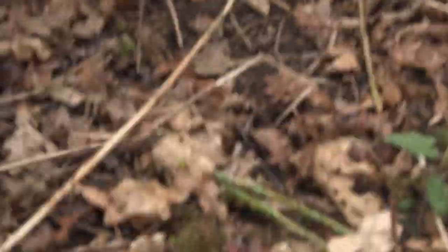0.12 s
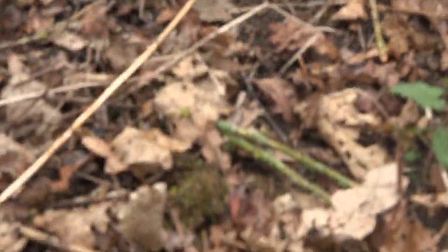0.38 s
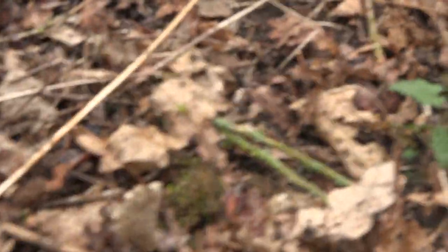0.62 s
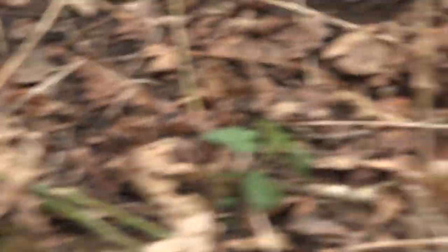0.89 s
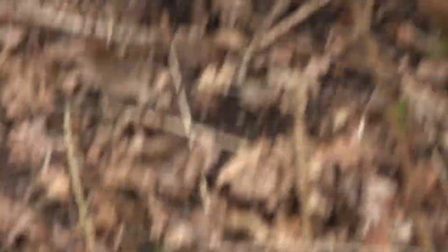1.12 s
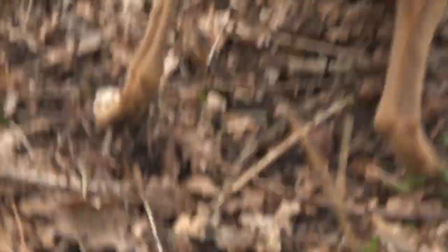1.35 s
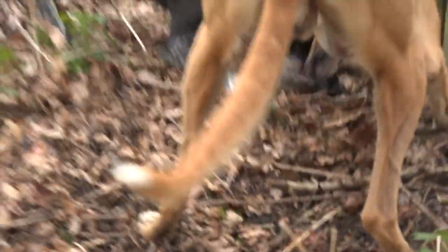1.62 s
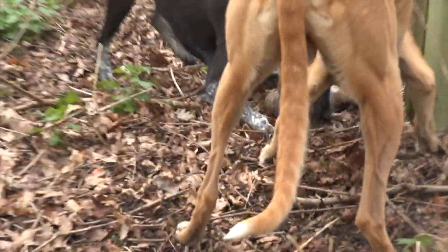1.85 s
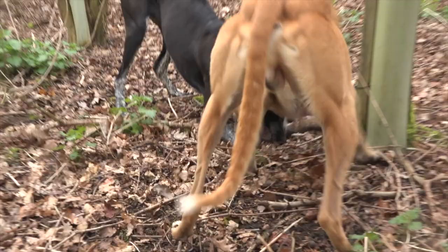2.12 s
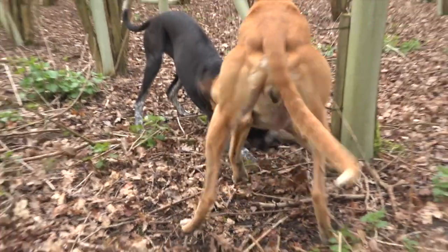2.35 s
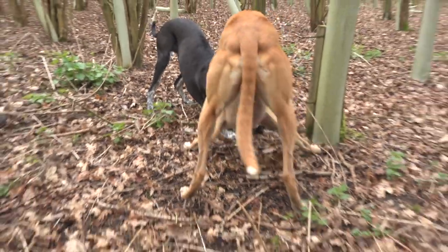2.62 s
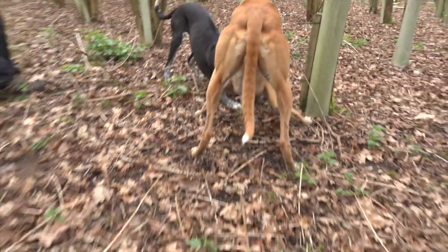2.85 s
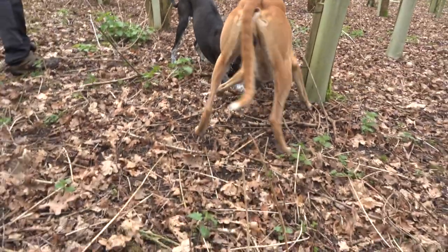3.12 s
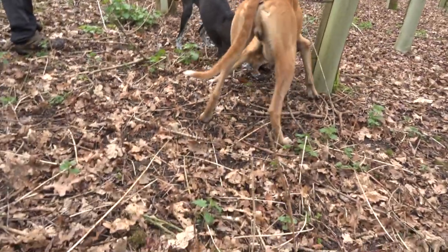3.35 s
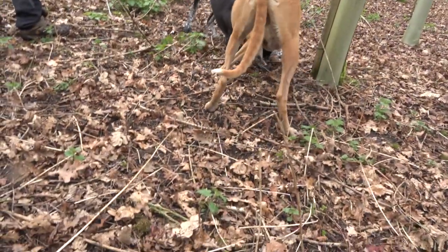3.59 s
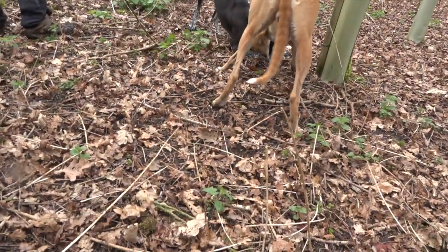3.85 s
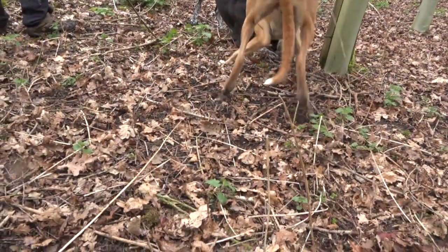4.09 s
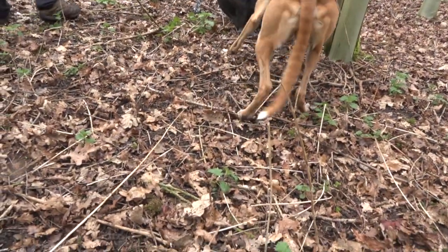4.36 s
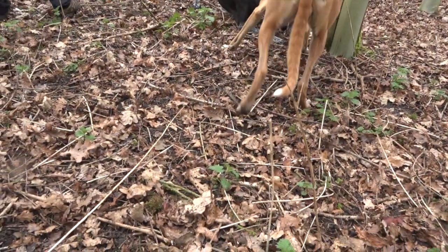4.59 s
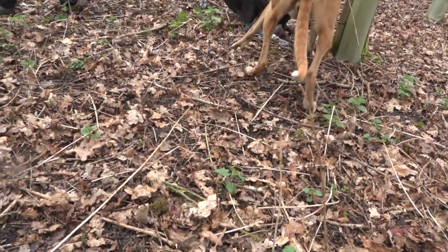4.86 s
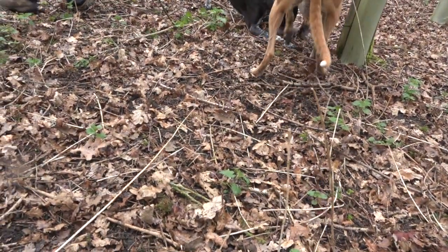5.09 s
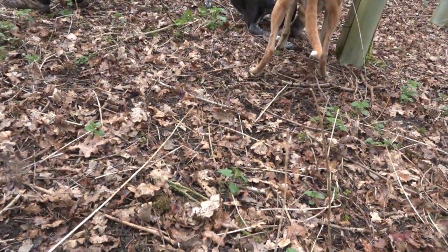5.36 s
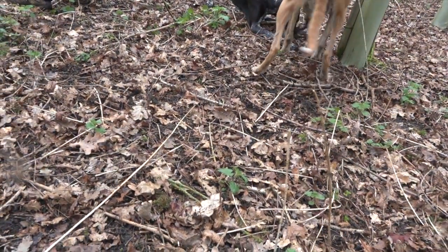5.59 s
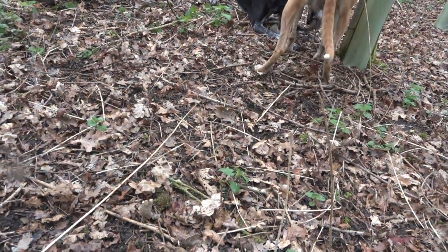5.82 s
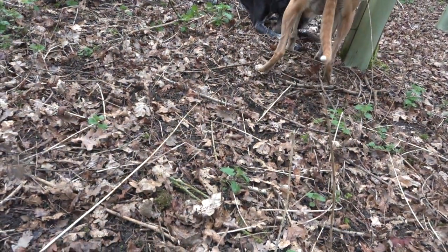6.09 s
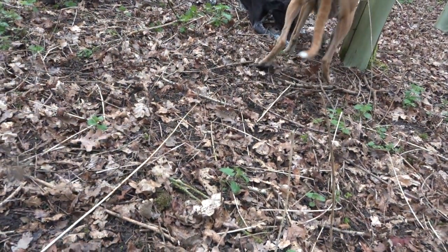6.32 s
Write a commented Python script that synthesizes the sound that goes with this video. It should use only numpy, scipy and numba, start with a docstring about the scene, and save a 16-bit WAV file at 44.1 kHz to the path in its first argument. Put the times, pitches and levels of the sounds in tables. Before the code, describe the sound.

Two dogs root through dry woodland leaves, rustling and snapping twigs, then snort and squeak through their noses while birds call faintly far off.

```python
"""Two dogs nose through dry leaf litter in a young wood, over a quiet hush and short echoes from the trunks.
First leaves rustle and twigs snap over thudding paws; then snorts hiss through nose resonances,
breaking into squeaks and reedy whistles. From 1.4 s hoarse bands of noise call as distant birds.
After 3.2 s the snorts pause; one dog whines at 4.1 s, a short glide of harmonics.
More snorts and squeaks follow from 4.6 s, and the last leaves snap and rustle at the end."""
import sys
import numpy as np
from scipy import signal
from scipy.fft import rfft, irfft, next_fast_len
from scipy.io import wavfile
from scipy.ndimage import uniform_filter1d
from numba import njit

SR = 44100
rng = np.random.default_rng(int(sys.argv[2]) if len(sys.argv) > 2 else 0)


def output_pcm(signal):
    """Save a mono or channel-first signal as 16-bit PCM at the path in sys.argv[1].

    Samples are clipped to [-1, 1] before scaling.
    """
    pcm = np.clip(np.atleast_2d(signal).T, -1, 1) * 32767
    wavfile.write(sys.argv[1], SR, np.round(pcm).astype(np.int16))


def boost_factor(decibels):
    """Convert a level in decibels to a linear amplitude factor."""
    exponent = np.asarray(decibels, float) / 20
    return 10 ** exponent


N = 284886  # samples, about 6.5 s
T = np.arange(N) / SR


def unit(x):
    """Normalisation: scale to rms 1."""
    return x / np.sqrt(np.mean(x ** 2))


def colour(x, points):
    """Linear filtering: shape the spectrum by (freq_hz, gain_db) points, straight in log frequency."""
    hz, db = np.transpose(points)
    size = next_fast_len(N)
    f = np.maximum(np.arange(size // 2 + 1) * SR / size, 1)
    gain = boost_factor(np.interp(np.log(f), np.log(hz), db))
    return irfft(rfft(x, size) * gain, size)[..., :N]


@njit
def svf(x, hz, width):
    """Resonance: a state-variable band-pass whose centre and width (Hz) move every sample."""
    y, b, l = np.empty(len(x)), 0., 0.
    for i in range(len(x)):
        g, k = np.tan(np.pi * hz[i] / SR), width[i] / hz[i]
        v = (b + g * (x[i] - l)) / (1 + g * (g + k))
        b, l, y[i] = 2 * v - b, l + 2 * g * v, k * v
    return y


@njit
def grains(start, hz, cycles, size, pan):
    """Impulse response of a damped oscillator: sine blips, each panned by its own amount."""
    out = np.zeros((2, N))
    for k in range(len(start)):
        # amplitude falls by a factor e in the given number of cycles
        p = np.exp(2j * np.pi * hz[k] / SR - hz[k] / (cycles[k] * SR))
        z = size[k] + 0j
        for i in range(start[k], min(N, start[k] + int(6 * cycles[k] * SR / hz[k]))):
            z *= p
            out[0, i] += z.imag * (1 + pan[k])
            out[1, i] += z.imag * (1 - pan[k])
    return out


def walk(rate):
    """Slow random modulation: normal levels held 1 / rate s and slewed twice; spread near 0.8."""
    k = max(int(SR / rate), 1)
    held = np.repeat(rng.standard_normal(N // k + 1), k)
    return 1.122 * uniform_filter1d(uniform_filter1d(held, k), k)[:N]


def wide(side_hz):
    """Interaural coherence: two-channel noise, alike in the bass and less so in the treble."""
    mid, side = rng.standard_normal((2, N))
    side = colour(side, [(500, -28), (0.6 * side_hz, -18), (side_hz, -5), (16000, -8)])
    return mid + side * np.array([[1], [-1]])


def swell(start, hold, attack, release):
    """Amplitude envelope: straight rise, hold, exponential release, all in s."""
    rise = np.clip((T - start) / attack, 0, 1)
    return rise * np.exp(-np.maximum(T - start - hold, 0) / release)


def between(ends, share):
    """Linear interpolation: a value from its ends at share 0 and 1."""
    return ends[0] + (ends[1] - ends[0]) * np.clip(share, 0, 1)


def calls(tables, fade_s):
    """Gating: columns of all calls joined in time, and a gate that opens for each."""
    rows = np.concatenate(tables)
    gate = sum(np.clip(np.minimum(T - t[0][0], t[-1][0] - T) / fade_s, 0, 1) for t in tables)
    return gate, [np.interp(T, rows[:, 0], column) for column in rows.T[1:]]


def tones(tables, wobble, flutter_db, fade_s):
    """Harmonic series: partials of one wavering pitch, each fluttering alone."""
    gate, (hz, *levels_db) = calls(tables, fade_s)
    phase = 2 * np.pi * np.cumsum(hz * (1 + wobble * walk(300))) / SR
    partials = [boost_factor(db + flutter_db * walk(120)) * np.sin((k + 1) * phase)
                for k, db in enumerate(levels_db)]
    return gate * np.sqrt(2) * sum(partials)


def notes(rows, partials_db):
    """Glide and envelope: each note slides evenly, peaks early and fades, with shared partials."""
    shape = [(0, -8), (0.35, 0), (1, -6)]  # share of length, dB
    return [[(start + u * length, between((first, last), u), *(db + d + np.array(partials_db)))
             for u, d in shape]
            for start, length, db, first, last in rows]


# spectrum of the woodland hush: freq_hz, gain_db
HUSH_SPECTRUM = [(15, -34), (30, 5), (48, 3.5), (153, 0.5), (180, -6), (326, -8.5), (575, -17),
                 (1260, -11.5), (1610, -12.5), (2690, -16), (4000, -27.5), (9000, -30), (16000, -71)]


def hush():
    """Diffuse ambience: partly coherent noise with a fixed spectrum and a slowly wandering level."""
    return unit(colour(wide(5100), HUSH_SPECTRUM)) * boost_factor(-61.5 + walk(3.134))


def trunks(x):
    """Reverberation: scattered, fading echoes from the trunks, partly different at each ear."""
    t60_s, onset_s, level_db = 0.23, 0.012, -19  # level before the colouring
    t = T[:SR // 2]
    mid, side = rng.standard_normal((2, len(t))) * boost_factor(-60 * t / t60_s) * np.clip(t / onset_s, 0, 1)
    echo = mid + 0.23 * side * np.array([[1], [-1]])
    wet = signal.fftconvolve(x, echo / np.sqrt(np.sum(mid ** 2)), axes=1)[:, :N]
    return boost_factor(level_db) * colour(wet, [(1000, 4), (5000, 7.5), (12000, -19)])


# hoarse far calls: start_s, length_s, level_db, pitch_hz
BIRD_CALLS = [(1.405, 0.37, -54, 2080), (1.93, .2, -65, 1260), (2.743, 0.53, -58.5, 1320),
              (3.237, 0.41, -56.5, 2040), (3.768, 0.26, -65.5, 1300), (4.5, 0.27, -67.5, 1270),
              (5.32, 0.39, -58.5, 1980)]


def birds():
    """Filtered noise: breathy bands that scoop up towards pitch and sag, with a weak octave."""
    scoop, scoop_s, sag, width_hz = 0.16, 0.045, 0.12, 200  # scoop and sag as shares of the pitch
    hz, gain = np.full(N, 1000.), 0
    for start, length, db, pitch in BIRD_CALLS:
        since = np.maximum(T - start, 0)
        bend = 1 - scoop * np.exp(-since / scoop_s) - sag * np.minimum(since / length, 1) ** 2
        hz = np.where(T >= start, pitch * bend, hz)
        gain = gain + boost_factor(db) * swell(start, 0.47 * length, 0.032, 0.15)

    def band(k):
        """Cascaded resonance: noise filtered twice around k times the pitch."""
        once = svf(rng.standard_normal(N), k * hz, np.full(N, k * width_hz))
        return unit(svf(once, k * hz, np.full(N, 2 * k * width_hz)))

    return gain * (band(0.95) + boost_factor(-13.5) * band(1.97))


# paws landing: start_s, level_db (before a common gain), pitch_hz
PAW_THUDS = [(0.105, -49.5, 87), (0.605, -44, 127), (0.679, -40, 196), (0.719, -49, 159), (1.008, -51, 146),
             (2.1, -49, 100), (2.406, -48, 153.6), (2.423, -49, 198), (2.446, -44.5, 204),
             (3.279, -52.5, 190), (4.111, -49, 274), (4.261, -44.5, 161)]


def thuds():
    """Damped impact: soft ground answers a paw with a cycle or two of bass."""
    s, db, hz = np.transpose(PAW_THUDS)
    thud = grains((s * SR).astype(np.int64), hz, np.full(len(s), 1.3), boost_factor(db + 4), np.zeros(len(s)))
    return colour(thud, [(400, 2), (1500, -28)])


# steady shuffling, levels before the surges: time_s, level_db, scuff_db (dull scuff relative to level)
SHUFFLE = [(0.0, -48.5, -16), (0.34, -44, -9.5), (0.5, -42, -9), (0.7, -43.5, -4.5), (1.58, -61, -6),
           (2.45, -59, -1), (2.57, -63, -22), (2.72, -59.5, -1), (2.95, -70.5, 8), (3.11, -55.5, -7),
           (3.49, -57, -3.5), (3.83, -65.5, 0.5), (4.14, -79, 1), (4.28, -61, -4.5), (5.54, -59.5, -3),
           (6.01, -71.5, -3), (6.24, -69.5, -2), (6.46, -57.5, -6)]
# a paw or muzzle sweeps the leaves: start_s, hold_s, level_db, scuff_db (relative to level)
LEAF_SWEEPS = [(0.0, 0.0064, -43.5, -7), (.045, 0.011, -45.5, -15), (0.219, 0.02, -56, -17),
               (0.303, 0.27, -45.5, -8), (0.656, 0.037, -38, -10), (0.97, 0.035, -59, -15),
               (1.016, 0.0075, -41, -4), (1.153, 0.013, -44, -34), (1.233, 0.03, -75, -33),
               (1.337, 0.064, -58, -8), (1.459, 0.1, -53.5, -18), (2.59, 0.033, -52.5, -3),
               (3.186, 0.15, -59.5, -9), (3.645, 0.02, -48.5, -37), (4.084, 0.13, -60, -12),
               (4.22, 0.04, -60.5, -15), (4.354, 0.024, -60, -21), (4.596, 0.01, -58, -18),
               (4.855, .04, -54.5, -23), (5.105, 0.035, -59, -11), (5.476, 0.059, -64, -25),
               (6.297, 0.077, -65, -2), (6.402, 0.031, -57.5, -15)]
# spectrum of rustling leaves: freq_hz, gain_db
LEAF_SPECTRUM = [(180, -3), (300, -8), (385, -22.5), (603, -11), (946, -12.5), (1320, -3), (6200, 1),
                 (11300, -12.5), (15000, -14), (16000, -78)]


def litter(count=18000):
    """Granular friction: dense short crackles of very unequal size over a smooth shuffle, in small surges."""
    u = rng.random((count, 5)).T
    start, hz, cycles = (u[0] * N).astype(np.int64), 600 * 22 ** u[1], 0.23 + 0.22 * u[2]
    size = boost_factor(np.minimum(-4.2 * np.log(1 - u[3]), 20))  # a few large, most small
    crackle = grains(start, hz, cycles, size, 0.16 * (u[4] - 0.5))
    crackle = unit(colour(crackle, [(500, -7), (4000, 0), (16000, 8)]))
    leaves = unit(colour(crackle * boost_factor(-3) + wide(8000), LEAF_SPECTRUM))
    scuff = wide(7200) * boost_factor(6 * walk(60))
    scuff = unit(colour(scuff, [(330, -4), (520, 9), (1200, 6.5), (2200, -9.5)]))
    surge_db = 2 * walk(70)
    s, db, scuff_db = np.transpose(SHUFFLE)
    stir = boost_factor(np.interp(T, s, db))
    drag = boost_factor(np.interp(T, s, db + scuff_db))
    for start, hold, db, scuff_db in LEAF_SWEEPS:
        sweep = boost_factor(db) * swell(start, hold, attack=0.014, release=0.0083)
        stir, drag = stir + sweep, drag + boost_factor(scuff_db) * sweep
    return boost_factor(surge_db) * (stir * leaves + drag * scuff)


# leaves and twigs snapping, levels before common gains:
# start_s, level_db, pitch_hz, splinters_db (relative to level), crumbling_ms
LEAF_SNAPS = [(0.11, -27.5, 2640, -1, 9.1), (0.154, -28, 6000, -5.5, 3.7), (0.323, -27.5, 7000, -0.5, 4.5),
              (0.346, -35, 1630, 2, 14), (0.386, -33, 2700, -13, 6.8), (0.613, -22, 650, -8, 5.5),
              (0.637, -25, 1470, -1, 6.4), (0.656, -30.5, 517, 4, 9.3), (0.678, -34, 2750, -15, 8),
              (0.932, -33.5, 2320, 2, 7.8), (1.045, -23, 5960, -3, 11), (1.152, -43, 7500, 6.5, 17.5),
              (3.19, -46.5, 9000, 3, 3.4), (2.051, -39.5, 3410, -3, 11.6), (2.381, -41.5, 4670, -6.5, 12),
              (2.61, -45, 1230, -13, 8.7), (3.292, -33, 1930, -9, 9.7), (3.349, -37.5, 2000, -0.5, 3),
              (3.429, -23, 5510, -45, 6.3), (3.445, -32, 1020, -40, 4.8), (3.654, -37, 5890, -8, 9.5),
              (3.838, -44, 1260, 1.5, 7.8), (3.88, -33, 660, -37, 6.4), (4.125, -28.5, 870, -17, 8.8),
              (4.197, -32, 890, -29, 5.9), (4.92, -50, 2110, 9, 5.2), (5.012, -28.5, 1260, -13.5, 6.4),
              (5.122, -44, 1170, -19, 6.9), (5.429, -36.5, 1890, -4.5, 21), (5.539, -44, 2010, -9.5, 14),
              (6.32, -38.5, 1020, -17, 5.1), (6.431, -25.5, 970, -37, 4.8), (6.451, -36, 991, -22, 9.1)]


def snaps():
    """Fracture: a short ring at the twig's pitch, then the leaf crumbles into bright, shrinking splinters."""
    s, db, hz, splinters_db, crumble_ms = np.transpose(LEAF_SNAPS)
    u = rng.random((len(s), 24, 3))  # 24 splinters a snap
    ring = grains((s * SR).astype(np.int64), hz, np.full(len(s), 1.8), boost_factor(db - 5.5), np.zeros(len(s)))
    delay = crumble_ms[:, None] / 1000 * u[..., 0] ** 1.1
    start = ((s[:, None] + delay) * SR).astype(np.int64).ravel()
    size = boost_factor(db + splinters_db + 1.5)[:, None] * (0.26 + u[..., 1]) * (1.2 - u[..., 0])
    splinter_hz = 2200 * 7 ** u[..., 2].ravel()
    splinters = grains(start, splinter_hz, np.full(start.size, 1.2), size.ravel(), np.zeros(start.size))
    return ring + splinters


# course of the whine: time_s, pitch_hz, level_db, dulling_db (added per overtone)
WHINE_COURSE = [(4.111, 290, -56.5, -12), (4.128, 343, -50.5, 4.5), (4.135, 460, -46, -0.5),
                (4.153, 479, -39.5, 0.5), (4.173, 481, -46.5, -1.5), (4.19, 500, -42.5, -35),
                (4.218, 573, -49, -27)]
# its partials from the fundamental up: gain_db
WHINE_PARTIALS = (-1, 3, -12, -24, -18)


def whine():
    """Voiced harmonics: a brief yelp whose overtones die as the mouth closes."""
    s, hz, db, dulling_db = np.transpose(WHINE_COURSE)
    partials = [db + p + k * dulling_db for k, p in enumerate(WHINE_PARTIALS)]
    return tones([np.transpose([s, hz, *partials])], wobble=0.0048, flutter_db=2.3, fade_s=0.0025)


# reedy notes, level before the partial gains: start_s, length_s, level_db, first_hz, last_hz
REEDY_WHISTLES = [(2.14, 0.0165, -50, 2480, 2290), (2.385, 0.035, -56.5, 2380, 2180),
                  (2.416, .034, -45.5, 2180, 2408), (2.904, 0.0118, -56, 2080, 2233),
                  (2.913, .02, -38, 2300, 1707), (2.934, 0.0233, -42, 1655, 1940),
                  (2.959, 0.018, -53, 1920, 1748), (4.795, 0.052, -42, 2180, 1665),
                  (5.69, 0.019, -38.5, 1780, 1616)]


def whistles():
    """Harmonic oscillation: short reedy glides with a strong second partial."""
    rows = notes(REEDY_WHISTLES, partials_db=(-9.5, 3, -4, -14, -35.5))
    return tones(rows, wobble=0.013, flutter_db=3, fade_s=0.003)


# pinched-nostril notes, level before the partial gain: start_s, length_s, level_db, first_hz, last_hz
NOSTRIL_SQUEAKS = [(1.06, 0.031, -35.5, 7600, 8100), (1.109, .022, -32.5, 7950, 8190),
                   (1.132, 0.016, -51, 8000, 8230), (1.148, .014, -46, 6500, 8500),
                   (1.165, 0.046, -43.5, 2200, 1890), (1.44, 0.046, -61, 7500, 7700),
                   (1.815, 0.1, -46, 2480, 3066), (2.16, 0.069, -48.5, 894, 850),
                   (2.455, 0.039, -45, 2910, 3630), (2.52, 0.034, -49, 6150, 5200),
                   (2.654, 0.0124, -37, 6340, 6030), (3.1, 0.0092, -53, 6800, 7300),
                   (4.611, .025, -40, 6500, 5840), (4.732, .053, -38.5, 3840, 3395),
                   (5.155, .035, -58, 1905, 2560), (5.335, 0.028, -47.5, 1277, 1000),
                   (5.621, .014, -34.5, 3503, 3510), (5.638, .025, -36, 4810, 6400),
                   (5.664, .025, -36, 6670, 5320), (5.94, 0.036, -55, 1950, 3050),
                   (5.99, 0.048, -54.5, 3050, 1570), (6.22, 0.021, -49, 3760, 3810)]


def squeaks():
    """Pure-tone oscillation: a pinched nostril sounds a single gliding, fluttering partial."""
    rows = notes(NOSTRIL_SQUEAKS, partials_db=(-0.5,))
    return tones(rows, wobble=0.02, flutter_db=5, fade_s=0.002)


# one list of rows a snort, levels before the flutter:
# time_s, level_db, nose_hz, upper_hz, opening (nostril, 0-1), effort (0-1)
SNORT_COURSES = [
    [(0.72, -39, 3380, 5760, 0.6, 0.4), (0.738, -39, 3800, 5560, 0.72, 0.85),
     (0.836, -39, 3200, 5700, 0.98, 0.77), (0.846, -35, 3450, 5500, 0.82, 0.67),
     (0.888, -42.5, 3700, 6120, 0.2, 0.84), (0.9, -54, 3580, 6040, 0.6, 0.55)],
    [(0.99, -53, 3410, 5770, 0.6, 0.8), (1.006, -29.5, 3370, 5700, 0.52, 0.46),
     (1.032, -47, 3700, 5760, 0.4, 0.85), (1.07, -52, 3800, 6760, 0.9, 1)],
    [(1.147, -59, 3660, 6990, 0.7, 0.55), (1.151, -50, 3800, 6820, 0.9, 0.73),
     (1.177, -30.5, 3730, 5070, 0.62, 0.69), (1.209, -31.5, 3540, 4900, 0.66, 0.3),
     (1.235, -54, 3650, 5240, 0.6, 0.8)],
    [(1.82, -72, 2900, 5410, 0.4, 0.6), (1.834, -48, 2990, 5200, 1, 0.64),
     (1.898, -29.5, 3340, 5230, 0.76, 0.56), (2.0, -57, 3730, 5600, 0.6, 0.66)],
    [(2.135, -62, 3600, 5560, 0.6, 0.55), (2.149, -40, 3570, 5540, 0.84, 0.5),
     (2.187, -40, 3100, 5130, 0.87, 0.6), (2.223, -39.5, 3360, 5600, 0.65, 0.9),
     (2.255, -63, 3440, 5460, 0.5, 0.76)],
    [(2.43, -61, 3690, 5400, 0.6, 0.55), (2.438, -39, 3560, 5570, 0.5, 0.72),
     (2.504, -39, 3610, 6720, 0.27, 0.72), (2.542, -39, 3800, 6200, 0.07, 0.43),
     (2.59, -57.5, 3740, 6800, 0.5, 0.6)],
    [(2.652, -50, 3480, 6110, 0.6, 0.55), (2.658, -41, 3550, 6110, 0.57, 0.75),
     (2.676, -33, 3400, 6150, 0.86, 0.5), (2.71, -58, 3500, 6040, 0.9, 0.8)],
    [(2.89, -53, 4340, 5280, 0.7, 0), (2.912, -36.5, 4270, 4900, 0.16, 0.56),
     (2.982, -44.5, 3800, 5670, 0.1, 0.72), (3.03, -59, 3700, 5460, 0.3, 0)],
    [(3.095, -66, 4100, 7130, 0.55, 0.55), (3.103, -45.5, 4430, 7300, 0.65, 1),
     (3.131, -37, 4200, 6290, 0.89, 0.77), (3.15, -63, 3950, 5720, 0.2, 0.9)],
    [(4.73, -80, 3790, 5850, 1, 0.4), (4.744, -42, 3730, 5910, 0.2, 0.45),
     (4.824, -36, 3820, 5910, 0.24, 0.57), (4.858, -58, 3690, 5520, 0.76, 0.5),
     (4.865, -45, 3620, 5450, 0.6, 0.3)],
    [(5.165, -50, 3320, 5620, 0.5, 0.55), (5.173, -43.5, 3280, 5630, 0.5, 0.44),
     (5.193, -46, 3180, 6000, 0.44, 0.44), (5.215, -56, 3330, 6100, 0.6, 0.8)],
    [(5.32, -55, 3605, 5700, 0.7, 0.55), (5.342, -40.5, 3830, 5360, 0.88, 0.43),
     (5.36, -41.5, 3830, 5450, 0.98, 0.6), (5.375, -59, 3800, 5640, 0.6, 0.3)],
    [(5.634, -48.5, 3620, 6200, 0.76, 0.82), (5.666, -41, 3520, 6280, 0.76, 0.9),
     (5.702, -46.5, 3620, 6350, 0.65, 0.65), (5.715, -46, 3400, 6090, 0.6, 0.55)],
    [(5.932, -60, 4020, 5760, 0.54, 0.55), (5.94, -27, 3940, 5900, 0.12, 0.2),
     (5.982, -39, 3980, 6800, 0.37, 0.64), (5.996, -45, 4010, 7350, 0.45, 0.81),
     (6.026, -40, 4040, 6320, 0.72, 0.5), (6.05, -65, 4100, 5750, 0.8, 0.55)],
]
# narrow side passages: ratio (multiple of the nose resonance)
SIDE_PASSAGES = (0.619, .8, 1.22, 1.45, 1.7, 2.2, 2.65)


def snorts():
    """Turbulence through resonances: fluttering noise in nose, side passages and throat, with airy hiss."""
    gate, (db, hz, upper_hz, opening, effort) = calls(SNORT_COURSES, fade_s=0.004)
    # harder effort lifts the upper resonance and the hiss: dB at 0 and at 1
    upper_gain, hiss_gain = boost_factor(between((-27.5, 6.5), effort)), boost_factor(between((-35, 3), effort))
    # a wider nostril lets the throat and side passages through: dB at 0 and at 1
    throat_gain, side_gain = boost_factor(between((-46.5, -7.5), opening)), boost_factor(between((-21, -5.5), opening))
    air = wide(9000) * boost_factor(1.5 * walk(140))
    # a pinched nostril rings narrowly, a flared one hisses broadly
    width = 200 * 12 ** np.clip(opening, 0, 1)
    upper_width = 0.63 * width + 300
    hz = hz * (1 + 0.025 * walk(60))
    # each side passage wanders and flutters alone, weaker by 4.5 dB per multiple
    sides = [(r * hz * (1 + 0.04 * walk(25)), boost_factor(-4.5 * r + 5 * walk(45))) for r in SIDE_PASSAGES]
    narrow, broad = np.full(N, 220.), np.full(N, 3000.)
    out = []
    for ear in air:
        streaks = unit(sum(g * svf(svf(ear, f, narrow), f, 2 * narrow) for f, g in sides))
        # the nose passes little below its resonance, more above
        nose = svf(svf(svf(ear, hz, width), hz, 3.8 * width), 1.09 * hz, hz)
        # gain by 1 / sqrt(width) keeps the loudness when a resonance narrows
        nose = unit(nose / np.sqrt(width))
        upper = svf(svf(ear, upper_hz, upper_width), upper_hz, broad)
        upper = unit(upper / np.sqrt(1.5 * width + 300))
        hiss = unit(colour(ear, [(6000, 3), (9000, 18), (12000, 5.5), (16000, -0.5)]))
        throat = unit(colour(ear, [(600, -26), (950, 5), (1500, 2), (2100, 7.5), (2800, -64)]))
        out.append(nose + upper_gain * upper + hiss_gain * hiss + throat_gain * throat
                   + side_gain * streaks)
    return np.array(out) * gate * boost_factor(db)


def scene():
    """Superposition: dogs and litter with their echo, over the hush of the wood and its birds."""
    near = snorts() + squeaks() + whistles() + whine() + litter() + snaps() + thuds()
    return hush() + birds() + trunks(near) + near


def roll_off(x):
    """The treble ends steeply here."""
    return signal.sosfilt(signal.butter(12, 16440, fs=SR, output="sos"), x)


# level difference of left over right port: freq_hz, difference_db
PORT_LEAN = [(60, 3.5), (110, 1.5), (200, 2), (380, 3), (700, 0), (1290, -0.5), (2380, -3.5), (4400, -2),
             (8120, 0), (15000, 0.5)]
# response of both ports: freq_hz, gain_db
PORT_RESPONSE = [(25, -12), (50, 0), (15700, 0), (16000, -40)]


def record(dry):
    """Transducer response: two close microphone ports that lean a little differently with pitch."""
    lean = np.array(PORT_LEAN)
    # each port takes half the difference
    ports = np.array([colour(dry[0], lean * [1, 0.5]), colour(dry[1], lean * [1, -0.5])])
    mix = colour(ports, PORT_RESPONSE)
    return roll_off(mix)


dry = scene()
out = record(dry)
output_pcm(out)
```